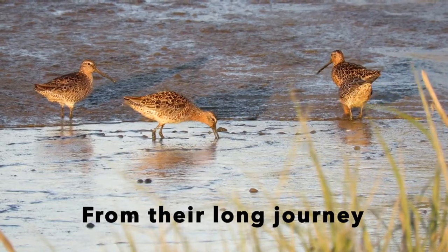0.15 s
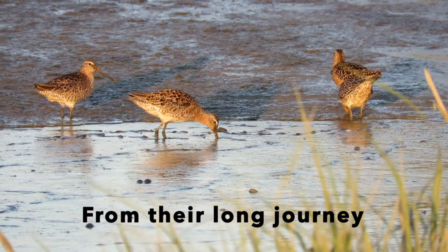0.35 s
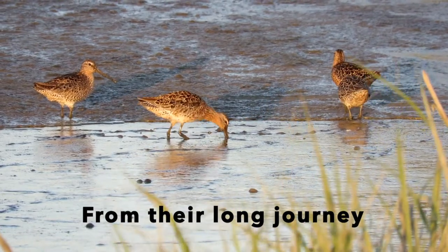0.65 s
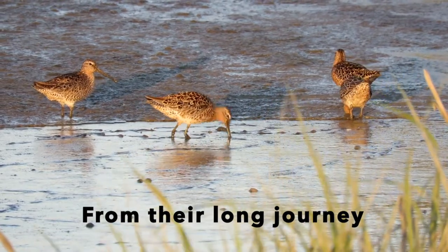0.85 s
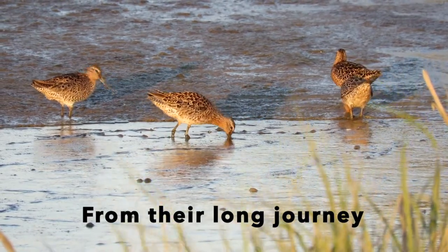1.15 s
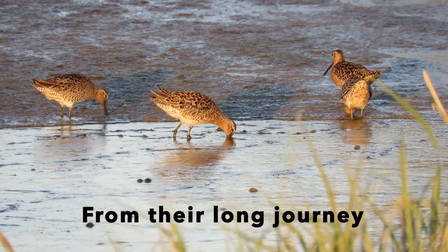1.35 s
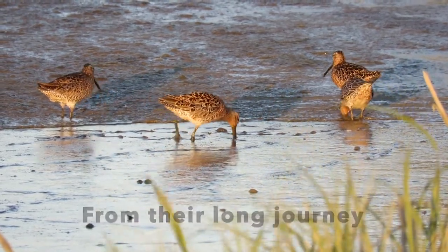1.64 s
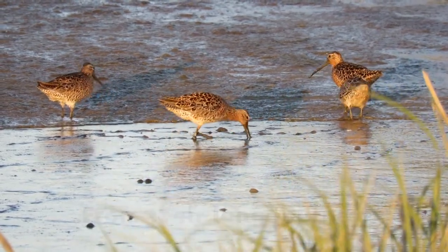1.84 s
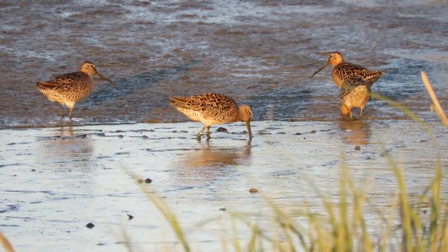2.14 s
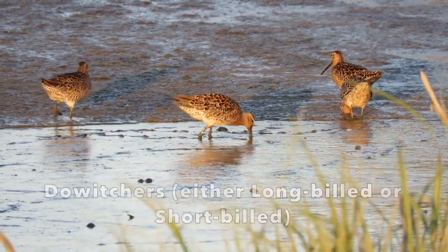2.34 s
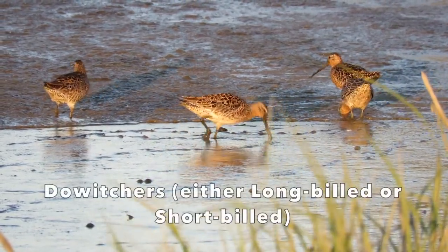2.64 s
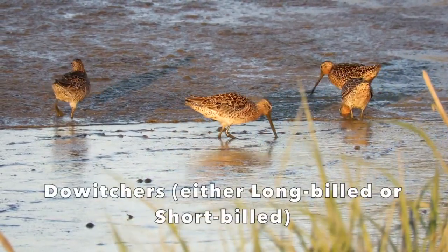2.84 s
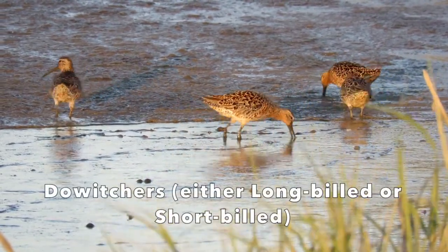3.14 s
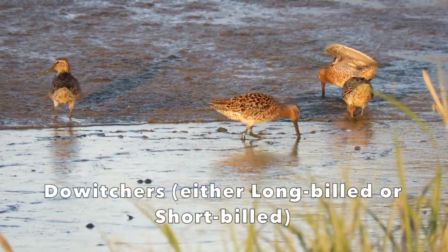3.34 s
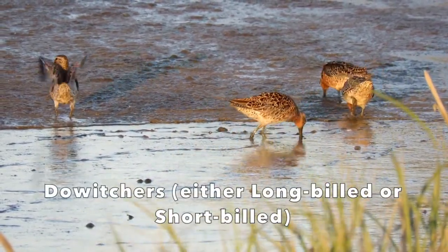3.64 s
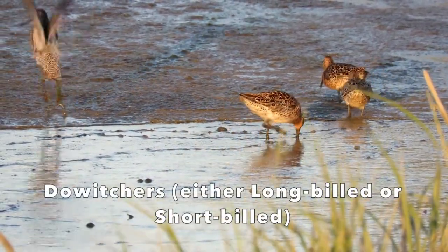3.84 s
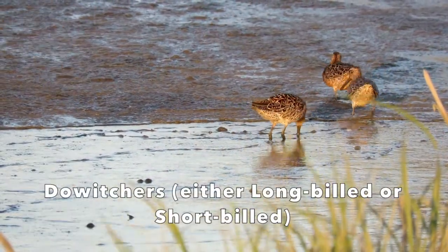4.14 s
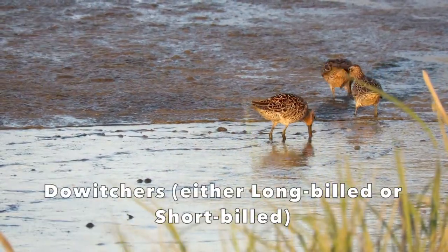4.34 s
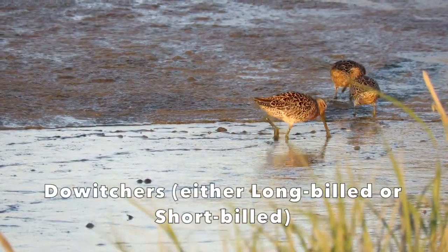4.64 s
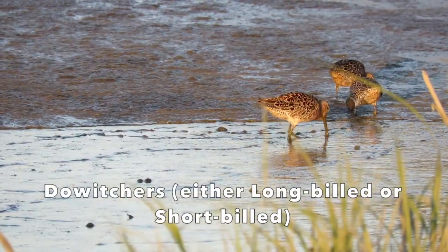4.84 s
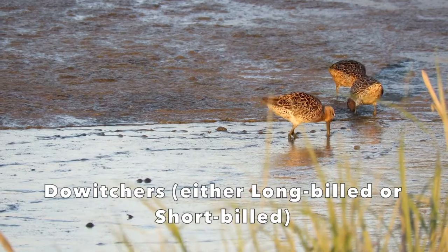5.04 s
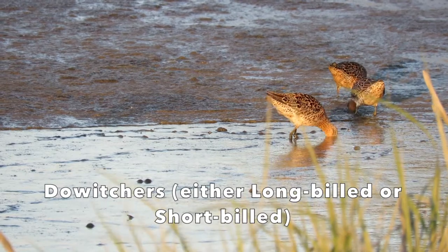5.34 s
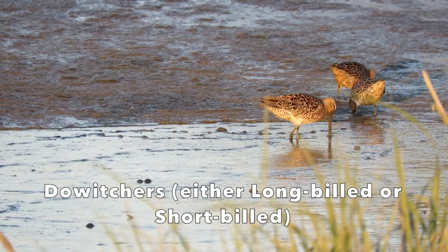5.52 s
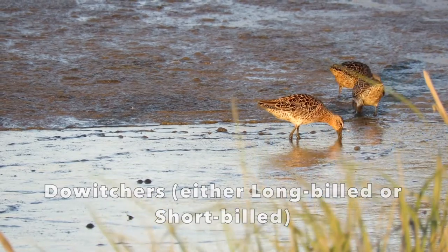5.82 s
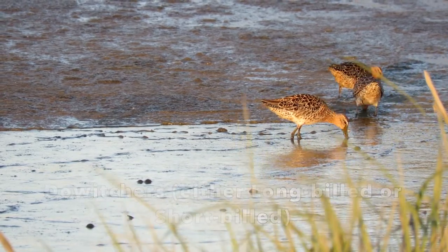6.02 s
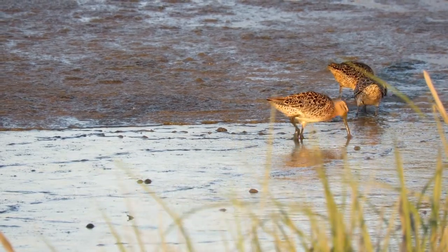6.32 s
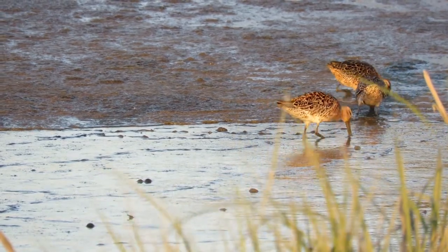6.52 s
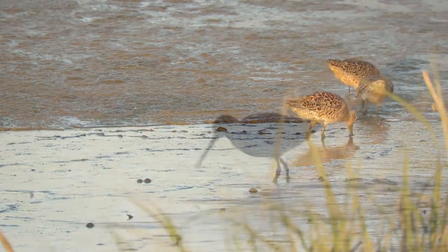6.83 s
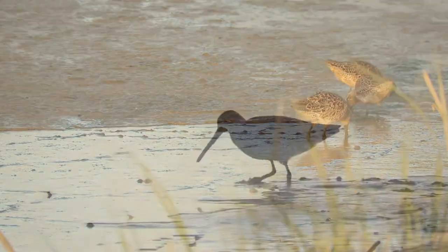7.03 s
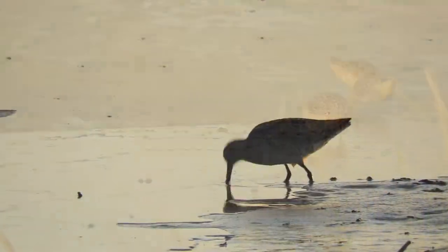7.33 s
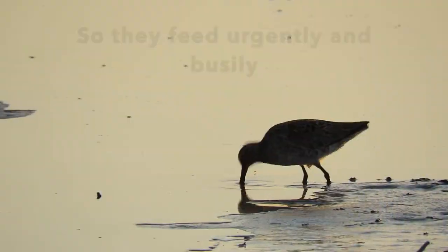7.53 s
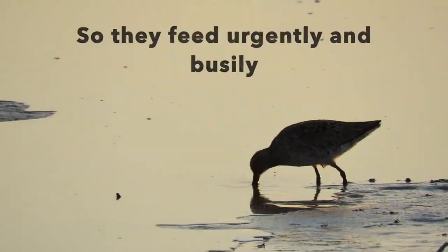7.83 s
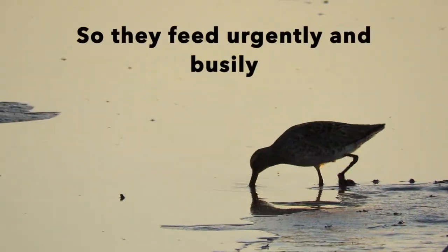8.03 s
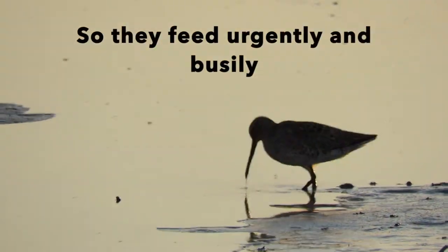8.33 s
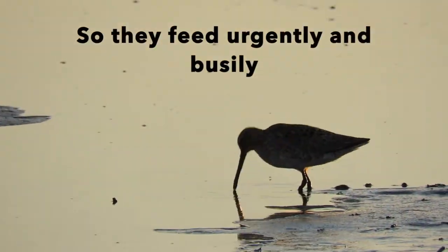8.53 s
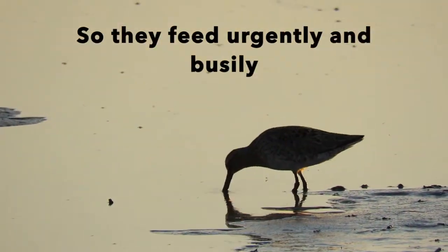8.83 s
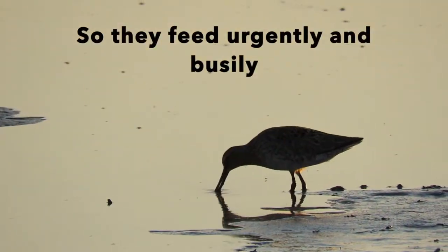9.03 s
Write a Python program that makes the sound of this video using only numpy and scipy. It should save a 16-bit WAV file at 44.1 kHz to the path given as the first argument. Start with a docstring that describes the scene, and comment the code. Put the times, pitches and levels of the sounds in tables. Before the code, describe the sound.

Shorebirds chip, peep and whistle close by on a tidal mudflat, a distant flock twittering behind, over a low boat drone and soft water hiss.

```python
"""On a tidal mudflat, shorebirds feed near and far, over shallow water and a distant boat.
Near birds chip, peep, sweep, warble and whistle with gliding tones; buzzes add close strands and breath noise.
The far flock is many small random calls over blurred noise. Bill ticks and spray are short noise bursts.
Water hiss, shore wash and exhaust roar are shaped noise; the engine drone is a stack of sine tones.
The bird calls return as smeared echoes, and a few soft low bumps touch the microphone."""
import sys
import numpy as np
from scipy import signal
from scipy.io import wavfile
from scipy.ndimage import uniform_filter1d, map_coordinates

SR = 44100
rng = np.random.default_rng(int(sys.argv[2]) if len(sys.argv) > 2 else 0)


def put_to_file(sound):
    """Save the sound as 16-bit audio at rate SR, in the file named by the first command-line argument."""
    columns = np.atleast_2d(sound).T  # one column per channel
    safe = np.clip(columns, -1, 1)
    whole_steps = np.round(safe * 32767)
    wavfile.write(sys.argv[1], SR, whole_steps.astype(np.int16))


N = 404397


def from_db(db):
    """Turn decibels into a plain gain."""
    return 10 ** (np.asarray(db) / 20)


def rms_one(x):
    """Scale a sound to an average strength (rms) of 1."""
    return x / np.sqrt(np.mean(x ** 2) + 1e-20)


def in_time(rows):
    """Join each column of a table by straight lines in time."""
    s, *columns = np.transpose(rows)
    return [np.interp(np.arange(N) / SR, s, c) for c in columns]


def at_hz(points, hz):
    """Read a curve at a pitch, with pitch spaced by octaves."""
    points_hz, values = np.transpose(points)
    return np.interp(np.log(hz), np.log(points_hz), values)


def drift(rate, size=N):
    """Wander by chance with a spread of about 1; a higher rate (roughly Hz) wanders faster."""
    r = np.exp(-80 * np.pi * rate / SR)
    chance = rng.standard_normal(size // 40 + 2002)     # one draw per 40 samples
    slow = signal.lfilter([1], [1, -2 * r, r * r], chance)[2000:]
    return np.interp(np.arange(size) / 40, np.arange(len(slow)), rms_one(slow))


def band(low_hz, high_hz, x):
    """Keep the part of a sound between two pitches."""
    return signal.sosfilt(signal.butter(2, [low_hz, high_hz], "band", fs=SR, output="sos"), x)


def add(out, s, sound):
    """Mix a sound in at a time."""
    i = max(round(s * SR), 0)
    out[i:i + len(sound)] += sound[:N - i]


def note(knots_s, pitches_hz, swell, octave_db, knots_db=0):
    """A voice-organ tone gliding through pitches, loudest at the swell (share of its length); rms 1."""
    t = np.arange(knots_s[0], knots_s[-1], 1 / SR)

    def glide(values):
        line = np.interp(t, knots_s, np.broadcast_to(values, len(knots_s)))
        return uniform_filter1d(line, size=len(t) // 10 + 1, mode="nearest")     # round the corners

    hz = glide(pitches_hz) * (1 + .012 * drift(150., size=len(t)))     # the pitch trembles
    octave_db = glide(octave_db) + 5.0 * drift(60., size=len(t))     # the overtone comes in patches
    phase = 2 * np.pi * np.cumsum(hz) / SR + rng.uniform(0, 2 * np.pi)
    u = np.linspace(0, 1, len(t))
    arch = np.abs(np.sin(np.pi * u ** (np.log(.5) / np.log(swell)))) ** 0.5
    tone = np.sin(phase) + from_db(octave_db) * np.sin(2 * phase)
    return rms_one(arch * from_db(glide(knots_db)) * tone)


CHIP_FULL_S = 0.047   # shorter chips plunge less far
CHIP_PLUNGE_S, CHIP_PLUNGE = 0.0088, 0.637   # time of the end plunge; share of the pitch left after a full one
CHIP_DROP_DB = -12   # fainter entry, dB per octave dropped


def chip(length, entry_hz, drop, body_hz, sag_hz_per_ms, octave_db):
    """The pitch drops fast and faint to the body, sags steadily, then plunges at the end."""
    turn = max(length - CHIP_PLUNGE_S, drop)
    low_hz = body_hz - sag_hz_per_ms * (turn - drop) * 10 ** 3
    end_hz = CHIP_PLUNGE ** min(length / CHIP_FULL_S, 1) * low_hz
    faint_db = CHIP_DROP_DB * np.log2(entry_hz / body_hz)
    overtone_db = octave_db - np.array([0, 2., 10., 20.])
    return note([0, drop, turn, length], [entry_hz, body_hz, low_hz, end_hz], 0.24, overtone_db,
                [faint_db, 0, -1.5, -8])


# Falling chips of the near birds.
# Columns: start [s], length [s], entry_pitch [Hz], drop_time [s], body_pitch [Hz], sag [Hz per ms],
# level [dB], octave_overtone at the entry [dB]
CHIP_CALLS = [(0.507, 0.056, 3640, 0.008, 2970, 27, -45, -15),
              (.546, 0.056, 3750, 0.017, 2960, 28.6, -38.5, -29),
              (0.613, 0.073, 4080, 0.014, 2470, 14, -48.5, -20),
              (0.64, 0.053, 4230, 0.0073, 2920, 14, -34.5, -30),
              (0.737, 0.058, 4140, 0.0068, 2805, 8.6, -36.5, -30),
              (0.743, 0.028, 2560, 0.0068, 2340, 9.6, -46, -42),
              (1.004, 0.044, 4760, 0.0076, 3355, 14.5, -40.5, -20),
              (1.042, 0.017, 2920, 0.0044, 1830, 20, -51, -40),
              (1.094, 0.029, 4750, 0.0065, 3190, 19, -40, -23),
              (1.126, 0.051, 4600, .008, 3880, 12, -46, -24),
              (1.175, 0.034, 4660, .009, 3090, 19, -48, -16),
              (1.217, 0.042, 4640, 0.012, 3600, 140, -53.5, -16),
              (1.285, 0.019, 4850, 0.014, 3850, 130, -54.5, 1),
              (1.353, 0.032, 4940, 0.01, 3100, 38, -44.5, -13),
              (1.422, 0.058, 4980, 0.012, 2910, 23, -45.5, -20),
              (1.484, 0.019, 4580, 0.0043, 4250, 50, -49, -11),
              (1.501, 0.034, 2900, 0.0061, 2630, 12, -46, -40),
              (1.858, 0.031, 5400, 0.012, 2870, 38, -46.5, -15),
              (1.923, 0.035, 4970, 0.004, 4600, 44, -52, -8),
              (1.951, 0.012, 2700, 0.0047, 2470, 25, -42.5, -40),
              (1.996, 0.043, 4600, 0.0058, 4460, 28, -54, -12),
              (2.026, 0.012, 2700, .004, 2390, 25, -43.5, -40),
              (2.076, 0.014, 4530, 0.0051, 4000, 20, -53.5, -30),
              (2.089, 0.021, 2870, 0.0033, 2570, 13, -46, -40),
              (2.589, 0.027, 4980, 0.0056, 4320, 13, -45, -11),
              (2.616, 0.021, 2950, 0.0049, 2670, 21, -42, -40),
              (2.675, 0.051, 4700, 0.0092, 4230, 18.5, -46.5, -13),
              (2.721, 0.015, 2460, 0.0056, 2420, 12, -43.5, -40),
              (2.772, 0.02, 4300, 0.0053, 3780, 32, -43.5, -21),
              (2.792, 0.027, 2880, 0.0056, 2770, 24, -41.5, -35),
              (4.462, 0.044, 1780, .005, 1680, 9.2, -65, -40)]


def chips():
    """Many short calls, each made by a falling tone."""
    out = np.zeros(N)
    for start_s, length_s, *pitch, level_db, octave_db in CHIP_CALLS:
        add(out, start_s, from_db(level_db) * chip(length_s, *pitch, octave_db))
    return out


PEEP_WAIT, PEEP_TOP = 0.131, 0.73   # shares of the length where the glide starts and ends
PEEP_DROOP = 0.94   # share of the top pitch left at the end


def peep(length, first_hz, top_hz, octave_db):
    """The pitch waits, glides to its top, then droops a little."""
    knots_s = length * np.array([0, PEEP_WAIT, PEEP_TOP, 1])
    return note(knots_s, [first_hz, first_hz, top_hz, PEEP_DROOP * top_hz], 0.47, octave_db)


# Rising peeps and held notes of the near birds.
# Columns: start [s], length [s], first_pitch [Hz], top_pitch [Hz], level [dB], octave_overtone [dB]
PEEP_CALLS = [(0.036, 0.033, 3850, 4700, -55.5, -35), (0.139, 0.019, 3900, 4270, -52.5, -35),
              (0.163, 0.022, 3680, 4580, -49.5, -38), (0.251, 0.04, 3820, 4770, -52.5, -35),
              (0.441, 0.011, 3880, 5200, -54, -37), (0.792, 0.016, 3730, 4280, -51.5, -37),
              (0.875, 0.036, 3550, 4560, -53.5, -35), (0.935, 0.054, 4040, 4300, -52, -35),
              (0.993, 0.0094, 3030, 4800, -41, -34), (1.045, 0.031, 3780, 5150, -50.5, -35),
              (1.083, 0.008, 2890, 4500, -44, -28), (1.174, 0.038, 3500, 4550, -49, -35),
              (0.633, 0.007, 3020, 4060, -49, -34), (1.348, 0.0071, 6500, 6770, -50.5, -35),
              (1.574, 0.017, 3740, 4600, -49, -27), (1.633, 0.069, 3700, 4360, -57, -37),
              (3.74, 0.024, 3400, 4700, -56, -35), (2.197, 0.021, 3930, 4750, -58, -35),
              (2.428, 0.027, 2614, 2716, -51, -37), (2.583, 0.0091, 6060, 6850, -57, -35),
              (2.72, 0.16, 4020, 4064, -57, -40), (2.721, 0.16, 3250, 3130, -54, -34),
              (3.1, 0.057, 4180, 4420, -59, -35), (3.911, 0.031, 3990, 4570, -61, -35),
              (4.063, 0.082, 3060, 3070, -65, -35), (4.125, 0.02, 3360, 4150, -60, -35),
              (4.311, 0.025, 3780, 4600, -64.5, -35), (4.529, 0.029, 3580, 4220, -63, -35),
              (4.797, 0.027, 3640, 4300, -60, -35), (4.212, 0.028, 4140, 4250, -57, -35),
              (4.436, 0.031, 3800, 4410, -57.5, -35), (4.822, 0.03, 3780, 4420, -57.5, -33),
              (4.935, 0.063, 3480, 3730, -53.5, -41), (5.225, 0.0098, 3650, 4330, -52, -30),
              (5.303, 0.15, 2030, 2090, -62.5, -36), (5.424, 0.12, 3034, 3050, -58.5, -35),
              (5.763, 0.028, 3510, 3940, -57, -35), (6.303, 0.047, 3060, 3540, -58, -34),
              (7.66, 0.024, 4000, 4700, -53, -35), (6.663, 0.019, 4480, 6000, -58.5, -35),
              (6.672, 0.015, 3720, 4280, -54, -35), (6.752, 0.026, 3520, 4350, -54.5, -35),
              (6.985, 0.085, 2060, 2050, -63.5, -35), (6.742, 0.034, 5200, 6030, -57, -35),
              (6.887, 0.022, 4100, 5500, -54.5, -35), (6.892, 0.021, 2810, 3500, -54, -35),
              (7.083, 0.043, 3530, 4470, -55.5, -37), (7.154, 0.053, 3350, 4430, -47, -32),
              (7.17, 0.025, 2520, 2720, -46.5, -4), (7.397, 0.038, 3040, 3550, -43.5, -17.5),
              (7.536, 0.05, 3212, 3880, -45, -33), (7.565, 0.019, 2520, 2640, -47, 1),
              (8.225, 0.016, 4600, 5360, -51, -35), (8.312, 0.024, 2750, 3590, -48.5, -14),
              (8.504, 0.04, 3170, 4360, -46.5, -33), (8.523, 0.022, 2600, 2710, -48.5, 1),
              (8.812, 0.054, 2580, 3080, -56, -9), (8.892, 0.041, 3610, 5300, -48.5, -20)]


def peeps():
    """Small calls, each made by a rising or held tone."""
    out = np.zeros(N)
    for start_s, length_s, first_hz, top_hz, level_db, octave_db in PEEP_CALLS:
        add(out, start_s, from_db(level_db) * peep(length_s, first_hz, top_hz, octave_db))
    return out


# How strong the three strands of a buzz are: below, on and above the throat pitch. Column: level [dB]
BUZZ_STRANDS = [-8.5, 0, -6]
BUZZ_JITTER, THROAT_WIDTH = .16, .4   # shares of the pulse rate and of the throat pitch
BUZZ_ARCH, BUZZ_SAG = 0.0297, 0.095   # the pitch bulges in the middle and ends lower, as shares
BUZZ_ATTACK_S, BUZZ_RELEASE_S = 0.0035, 0.004


def buzz(n, throat_hz, pulse_hz):
    """Three unsteady strands about one pulse rate apart beat together, with breath noise."""
    u = np.linspace(0, 1, n)
    arch = 1 + BUZZ_ARCH * np.sin(np.pi * u) - BUZZ_SAG * (u - .5)
    tone = 0
    for k, db in enumerate(BUZZ_STRANDS):
        wobble = drift(25., size=n) + .6 * drift(250., size=n)
        hz = (throat_hz + (k - 1) * pulse_hz) * arch + pulse_hz * BUZZ_JITTER * wobble
        patchy = from_db(db + 4.5 * drift(70., size=n))     # each strand breaks up on its own
        tone = tone + patchy * np.sin(2 * np.pi * np.cumsum(hz) / SR)
    low_hz, high_hz = throat_hz * (1 + THROAT_WIDTH * np.array([-.5, .5]))
    breath = band(low_hz, high_hz, rng.standard_normal(n))
    t = np.arange(n) / SR
    ends = np.clip(np.minimum(t / BUZZ_ATTACK_S, t[::-1] / BUZZ_RELEASE_S), 0, 1)
    return ends * rms_one(rms_one(tone) + .3 * rms_one(breath))


SWEEP_HOLD_HZ, SWEEP_BEND_HZ, SWEEP_TOP_HZ = 3840, 4180, 5400
SWEEP_LIFT_S, SWEEP_BEND_S, SWEEP_TOP_S = 0.03296, .018, 0.0053   # before the end
SECOND_SIDE_HZ, SECOND_SIDE_DB = (3190, 4000), -0.5   # a lower rise under the upsweep
SWEEP_RASP_HZ, SWEEP_PULSE_HZ, SWEEP_RASP_DB = 4200, 343, -7
SWEEP_SUM_DB, SWEEP_BREATH_DB = -25, -6.5   # the two sides' sum tone; breath noise


def sweep(length):
    """Holds low, then sweeps up as the second side of the voice organ joins below; rasp and breath swell."""
    knots_s = [-length, -SWEEP_LIFT_S, -SWEEP_BEND_S, -SWEEP_TOP_S, 0]
    pitches_hz = [SWEEP_HOLD_HZ, SWEEP_HOLD_HZ, SWEEP_BEND_HZ, SWEEP_TOP_HZ, 0.976 * SWEEP_TOP_HZ]
    out = note(knots_s, pitches_hz, 0.8, -33)
    low = note([-SWEEP_BEND_S, 0], SECOND_SIDE_HZ, 0.69, -24)
    sum_hz = np.add(SECOND_SIDE_HZ, [SWEEP_BEND_HZ, SWEEP_TOP_HZ])
    both = note([-SWEEP_BEND_S, 0], sum_hz, 0.8, -60)
    second = from_db(SECOND_SIDE_DB) * low + from_db(SWEEP_SUM_DB) * both
    add(out, length - SWEEP_BEND_S - 2 / SR, second[:-4])     # trimmed to fit inside the call
    arch = np.hanning(len(out))
    breath = rms_one(band(2900, 5900, rng.standard_normal(len(out))))
    out = out + from_db(SWEEP_BREATH_DB) * np.sqrt(arch) * breath
    return out + from_db(SWEEP_RASP_DB) * arch * buzz(len(out), SWEEP_RASP_HZ, SWEEP_PULSE_HZ)


SWEEP_ECHO_S, SWEEP_ECHO_DB = .038, -13   # a bank behind the bird returns one clear echo
# One bird's run of upswept calls. Columns: end [s], length [s], level [dB]
SWEEP_CALLS = [(7.537, 0.049, -49), (7.62, 0.051, -49), (7.726, 0.073, -49), (7.862, 0.073, -49),
               (7.967, 0.061, -49), (8.109, 0.071, -50), (8.232, .07, -49), (8.415, 0.052, -52.5),
               (8.515, 0.067, -48), (8.654, 0.067, -53)]


def sweeps():
    """Each upswept call sounds once directly and once as an echo."""
    out = np.zeros(N)
    for end_s, length_s, level_db in SWEEP_CALLS:
        call = from_db(level_db) * sweep(length_s)
        add(out, end_s - length_s, call)
        add(out, end_s - length_s + SWEEP_ECHO_S, from_db(SWEEP_ECHO_DB) * call)
    return out


# Dipping warbles. Columns: start [s], level [dB]
WARBLE_CALLS = [(8.627, -45.5), (8.979, -43.5)]
# The pitch path of every warble. Columns: time after the start [s], pitch [Hz]
WARBLE_PATH = [(0, 4100), (.015, 3950), (.026, 4200), (.043, 3670), (.052, 3700), (.062, 4510),
               (.068, 4120)]


def warbles():
    """One tone whose pitch dips and climbs along a fixed path."""
    out = np.zeros(N)
    for start_s, level_db in WARBLE_CALLS:
        add(out, start_s, from_db(level_db) * note(*np.transpose(WARBLE_PATH), 0.72, -37))
    return out


def near_notes():
    """All gliding calls of the near birds, fluttering a little in strength."""
    return (chips() + peeps() + sweeps() + warbles()) * from_db(2.1 * drift(100.))


OVERTONES_FULL_DB = -40   # above this whistle level the overtones grow no further
# Long whistles, one list of points each. Columns: time [s], pitch [Hz], level [dB]
WHISTLE_PATHS = [
    [(3.372, 1845, -68), (3.383, 2292, -39), (3.397, 2506, -35.5), (3.42, 2450, -27.5), (3.445, 2538, -30),
     (3.457, 2430, -41), (3.464, 2490, -42)],
    [(3.507, 2450, -31.5), (3.517, 2480, -39.5), (3.53, 2590, -44), (3.555, 2670, -38),
     (3.568, 2553, -31.5), (3.58, 2452, -26.5), (3.6, 2480, -26.5), (3.622, 2544, -30), (3.633, 2660, -47)],
    [(3.732, 2136, -52), (3.742, 2216, -40), (3.76, 2385, -34), (3.785, 2300, -31.5), (3.81, 2243, -41.5),
     (3.824, 2060, -67)],
    [(5.228, 2610, -51), (5.238, 3114, -34), (5.252, 2960, -33.5), (5.27, 2650, -35), (5.3, 2600, -35.5),
     (5.34, 2624, -35), (5.353, 2510, -63)],
]
# Overtones at 2, 3, 4 and 5 times the pitch, before the changes below. Column: level [dB]
WHISTLE_OVERTONES = [-16, -33, -32, -38]
# How strong the overtones of each whistle are. Column: added level [dB]
WHISTLE_EDGES = [-9, -1, -3, -14]


def whistles():
    """Long clear tones that follow drawn pitch paths, with faint wavering overtones and soft ends."""
    out = np.zeros(N)
    for rows, edge_db in zip(WHISTLE_PATHS, WHISTLE_EDGES):
        s, hz, level_db = np.transpose(rows)
        t = np.arange(s[0], s[-1], 1 / SR)
        phase = 2 * np.pi * np.cumsum(np.interp(t, s, hz)) / SR
        level_db = np.interp(t, s, level_db)
        edge_db = edge_db - np.maximum(level_db - OVERTONES_FULL_DB, 0)
        tone = np.sin(phase)
        for multiple, db in enumerate(WHISTLE_OVERTONES, start=2):
            waver_db = 4.5 * drift(15., size=len(t))
            tone = tone + from_db(db + edge_db + waver_db) * np.sin(multiple * phase)
        ends = np.clip(np.minimum(t - s[0], s[-1] - t) / 0.0016, 0, 1)
        add(out, s[0], np.sqrt(2) * from_db(level_db) * ends * tone)
    return out


BUZZ_BASE_PULSE_HZ = 780   # each call draws its own rate around this
# Buzzy calls. Columns: start [s], length [s], throat_pitch [Hz], level [dB]
BUZZ_CALLS = [(0.151, 0.052, 2610, -54.5), (0.352, 0.06, 2570, -59.5), (1.128, 0.084, 2610, -49),
              (1.316, 0.076, 2546, -43.5), (1.507, 0.066, 2614, -45), (1.698, 0.062, 2444, -46),
              (1.878, 0.066, 2410, -49), (2.068, 0.057, 2594, -51), (2.238, 0.066, 2520, -56),
              (2.412, 0.05, 2590, -56), (2.866, 0.039, 2516, -53.5), (3, 0.041, 2350, -55),
              (5.973, 0.044, 2970, -49.5), (6.396, 0.025, 3410, -52.5), (6.758, 0.035, 2920, -54),
              (8.88, 0.042, 4600, -54)]


def buzzes():
    """Short rough calls, each with its own pulse rate."""
    out = np.zeros(N)
    for start_s, length_s, throat_hz, level_db in BUZZ_CALLS:
        pulse_hz = BUZZ_BASE_PULSE_HZ * rng.uniform(.85, 1.1)
        add(out, start_s, from_db(level_db) * buzz(round(length_s * SR), throat_hz, pulse_hz))
    return out


# Bill ticks in the wet mud. Columns: start [s], noise level before filtering [dB]
BILL_TICKS = [(6.606, -36.5), (6.627, -40), (8.234, -26), (8.237, -29), (8.923, -38)]


def ticks():
    """A click with a few milliseconds of bright splash, made from fast-fading noise."""
    out, t = np.zeros(N), np.arange(round(.012 * SR)) / SR
    for start_s, level_db in BILL_TICKS:
        add(out, start_s, from_db(level_db) * np.exp(-t / 0.0026) * rng.standard_normal(len(t)))
    return band(1400, 4500, out) + from_db(-33) * np.diff(out, prepend=0)     # body plus a bright edge


# Fine spray in the shallows. Columns: middle [s], length [s], level before the flicker [dB]
SPRAY_SWELLS = [(6.62, .12, -77), (7.3, .14, -75), (7.717, .09, -65), (8.525, .12, -62), (8.916, .05, -68)]


def sprays():
    """Short flickering swells of very bright hiss, unrelated at the two ports."""
    swells = np.zeros(N)
    hiss = band(8500, 13800, rng.standard_normal((2, N)))
    for middle_s, length_s, level_db in SPRAY_SWELLS:
        add(swells, middle_s - length_s / 2, from_db(level_db) * np.hanning(round(length_s * SR)))
    return swells * rms_one(hiss) * from_db(2.5 * drift(60.))


def far_peeps(count=560):
    """Many small calls at random moments: quick high ones that rise, longer low ones that hold or sag."""
    out = np.zeros(N)
    for when, pitch, rise, long, loud in rng.random((count, 5)):
        hz = 2400 * 1.75 ** np.sqrt(pitch)
        length_s = .012 + .015 * long + 0.052 * long * (1 - pitch)
        top_hz = hz * (.93 + 0.264 * rise * pitch)
        add(out, when * N / SR, from_db(11.0 * loud) * peep(length_s, hz, top_hz, -29))
    return rms_one(out * from_db(2.5 * drift(120.)))


# How alike left and right noise are (1 = the same). Columns: pitch [Hz], likeness [0 to 1]
LEFT_RIGHT_LIKENESS = [(60, .93), (150, 1), (300, 0.28), (1000, 0.16), (3000, 0.22), (8000, 0.067),
                       (13000, 0.14)]


def banded_noise(spectrum, patchy_db):
    """Third-octave bands of stereo noise, each with its own level, flicker and likeness; rms 1."""
    low_end, high_end = spectrum[0][0], spectrum[-1][0]
    edges = np.geomspace(low_end, high_end, round(3 * np.log2(high_end / low_end)) + 1)
    out, together, white = 0, drift(4.06), rng.standard_normal((2, 2, N))
    for k, (low, high) in enumerate(zip(edges, edges[1:])):
        mid, side = band(low, high, white[k % 2])
        hz = np.sqrt(low * high)
        alike = np.clip(at_hz(LEFT_RIGHT_LIKENESS, hz), -1, 1)
        flicker = 0.59 * together + drift(20.0)     # partly shared, partly the band's own
        gain = from_db(at_hz(spectrum, hz) + patchy_db * flicker)
        out = out + gain * (np.sqrt(1 + alike) * mid + np.sqrt(1 - alike) * side * [[1], [-1]])
    return rms_one(out)


FAR_PEEPS_DB = -3.5   # single far voices, against the babble
# Far flock level over time. Columns: time [s], level [dB]
FLOCK_LEVEL = [(0, -63), (.7, -58), (1.3, -56.5), (2.2, -63.5), (3.3, -63), (3.6, -60.5), (4.2, -68),
               (4.9, -62), (5.5, -59), (6.3, -63.5), (6.9, -60), (7.8, -58.5), (9.17, -59)]
# Tone color of the blurred far voices. Columns: pitch [Hz], relative level [dB per Hz]
BABBLE_COLOR = [(1000, -19.5), (1700, -4), (3490, 5), (4260, -11), (4710, 7.5), (7500, -29.5), (9750, -62),
                (16500, -120)]


def far_flock():
    """Single far voices (mono) and, as shaped noise, the blurred babble of the rest (stereo)."""
    flock_db, = in_time(FLOCK_LEVEL)
    voices = from_db(flock_db + FAR_PEEPS_DB) * far_peeps()
    babble = from_db(flock_db) * banded_noise(BABBLE_COLOR, patchy_db=3.5)
    return voices, babble


# Shallow water hiss over time. Columns: time [s], level [dB]
WATER_LEVEL = [(0, -73.5), (1.4, -71), (3.3, -75.5), (3.55, -70.5), (4.8, -77), (4.95, -69), (5.3, -67.5),
               (6.45, -73), (6.6, -65.5), (7.0, -72), (7.7, -70), (8.3, -68), (8.55, -63), (8.9, -63.5),
               (9.0, -71), (9.17, -66.5)]
# Tone color of the shallow water. Columns: pitch [Hz], relative level [dB per Hz]
WATER_COLOR = [(2940, -13.5), (5000, -3.5), (5950, -2.5), (11300, -10), (12700, -17), (14900, -17)]


def shallow_water():
    """Bright shaped noise that swells and fades as a hiss."""
    return from_db(in_time(WATER_LEVEL)[0]) * banded_noise(WATER_COLOR, patchy_db=-1.0)


# Tone color of the shore wash. Columns: pitch [Hz], relative level [dB per Hz]
WASH_COLOR = [(160, -31), (280, -9.5), (387, -5), (869, -8), (1170, -13), (2400, -21), (3120, -53),
              (5280, -120)]


def shore_wash(wash_db):
    """Noise shaped to fill the middle pitches."""
    return from_db(wash_db) * banded_noise(WASH_COLOR, patchy_db=1.7)


# Engine speed over time. Columns: time [s], turn_rate [turns per s]
ENGINE_TURNS = [(0, 23.8), (.4, 23.3), (1.3, 23.6), (2.4, 23.2), (4.1, 22.9), (5.5, 23.3), (6.8, 22.2),
                (9.17, 25.2)]
# Engine tones. Columns: multiple of the turn rate [times], level before wavering [dB]
ENGINE_ORDERS = [(3, -14), (4, 1), (5, -9.5), (6, -10), (7, -10), (8, -0.5), (8.5, -2), (9, -6.5),
                 (9.5, -7), (10, -9.5), (10.5, -7), (12, -12.5), (12.5, -18), (13, -8.5)]


def engine():
    """Sine tones at multiples of the turn rate; the air makes each one waver, the upper ones most."""
    phase = 2 * np.pi * np.cumsum(in_time(ENGINE_TURNS)[0]) / SR
    out = 0
    for multiple, db in ENGINE_ORDERS:
        gain = np.sqrt(2) * from_db(db + 0.18 * multiple * drift(1.5))
        out = out + gain * np.sin(multiple * phase + rng.uniform(0, 6.5))
    return out


def boat_drone(engine_db, spread):
    """The engine tones, with a late ground path that has opposite signs at the two ports."""
    drone = from_db(engine_db) * engine()
    late = np.roll(drone, round(0.0024 * SR))
    return drone + spread * 0.7 * drift(1.84) * late * [[1], [-1]]


# Tone color of the exhaust. Columns: pitch [Hz], relative level [dB per Hz]
ROAR_COLOR = [(50, -21.5), (80, -24.5), (140, -14.5), (200, 2), (250, -4), (310, -16.5), (360, -12)]


def exhaust_roar(roar_db, spread):
    """Low shaped noise, the same at both ports plus an adjustable left-right difference."""
    roar = from_db(roar_db) * banded_noise(ROAR_COLOR, patchy_db=2.5)
    return roar.mean(axis=0) + spread * (roar - roar[::-1]) * 2


# Soft bumps on the microphone. Columns: start [s], size before softening [dB], cycle_rate [Hz]
MICROPHONE_BUMPS = [(2.881, -45, 62.4), (3.118, -29, 120), (7.259, -41, 113)]


def bumps():
    """One main push and pull of the microphone capsule, with soft ends."""
    out = np.zeros(N)
    for start_s, size_db, hz in MICROPHONE_BUMPS:
        turn = np.arange(-1, 1, hz / SR)
        push = -from_db(size_db) * np.sin(2 * np.pi * turn) * np.cos(np.pi * turn / 2) ** 2
        add(out, start_s - .5 / hz, push)
    return out


# Echoes off banks and reeds. Columns: delay [s], level before the noise [dB]
BANK_ECHOES = [(0.037, -51), (0.089, -52), (.13, -58)]


def flats(x):
    """Smeared echoes across the flats, made with fading noise that differs at each port."""
    t = np.arange(round(.5 * SR)) / SR
    shape = from_db(-42.0) * np.exp(-t / 0.045)
    for delay_s, db in BANK_ECHOES:
        shape = shape + from_db(db) * np.exp(-((t - delay_s) / (.2 * delay_s)) ** 2)
    return signal.fftconvolve(x[None], shape * rng.standard_normal((2, len(t))), axes=1)[:, :N]


DB_PER_LEAD_US = 0.06   # the nearer port is also a little louder


def port_gain(lead_us):
    """Share the loudness difference between the two ports."""
    return from_db(DB_PER_LEAD_US * np.array([lead_us, -lead_us]) / 2)


def ports(x, lead_us):
    """Two close microphone ports: one hears the sound a little earlier and louder."""
    half_us = np.array([lead_us, -lead_us]) / 2
    at = np.arange(N) + half_us * SR / 10 ** 6
    return map_coordinates(x, [at], order=3) * port_gain(lead_us)


# Boat and shore levels. Columns: time [s], engine_drone [dB], exhaust_roar [dB], shore_wash [dB]
BOAT_AND_SHORE = [(0, -53, -50, -55), (.7, -51.5, -48, -52.5), (1.3, -48.5, -48, -51.5),
                  (2.2, -53.5, -52.5, -53.5), (3.3, -55.5, -52.5, -55.5), (3.6, -52.5, -50, -51),
                  (4.2, -55, -56.5, -56), (4.75, -60.5, -55, -60), (4.95, -63, -49, -52),
                  (5.6, -66, -52, -52.5), (6.4, -65.5, -52, -54), (6.9, -59, -48, -53.5),
                  (7.8, -57.5, -49.5, -51.5), (9.17, -56, -47.5, -50)]
# Left-right place of the sounds over time, and how far the boat spreads.
# Columns: time [s], lead of the left port [microseconds], boat_spread [0 to 1]
LEFT_RIGHT_PLACE = [(0, 19, 0.14), (4.7, 31, 0.28), (5., 2, 0.09), (6.5, -5, 0), (9.17, -5, 0)]


def scene():
    """Mix all sources at the two ports."""
    engine_db, roar_db, wash_db = in_time(BOAT_AND_SHORE)
    lead_us, spread = in_time(LEFT_RIGHT_PLACE)
    far_voices, babble = far_flock()
    birds = near_notes() + whistles() + buzzes() + far_voices
    boat = boat_drone(engine_db, spread) + exhaust_roar(roar_db, spread)
    wide = (babble + shallow_water() + shore_wash(wash_db) + boat) * port_gain(lead_us)
    # the left-right place of all calls and ticks wanders a little by chance
    wandering_lead_us = lead_us + 7 * drift(6.)
    return ports(birds + ticks(), wandering_lead_us) + flats(birds) + wide + bumps() + sprays()


def record(dry):
    """Roll off the bass below 52 Hz and cut the top steeply, 70 dB down from 15300 Hz."""
    thin = signal.sosfilt(signal.butter(3, 52, "high", fs=SR, output="sos"), dry)
    return signal.sosfilt(signal.cheby2(12, 70, 15300, fs=SR, output="sos"), thin)


dry = scene()
out = record(dry)
put_to_file(out)
```